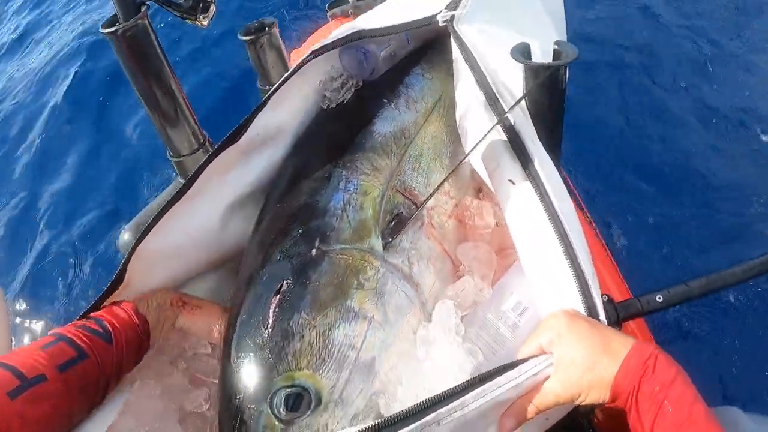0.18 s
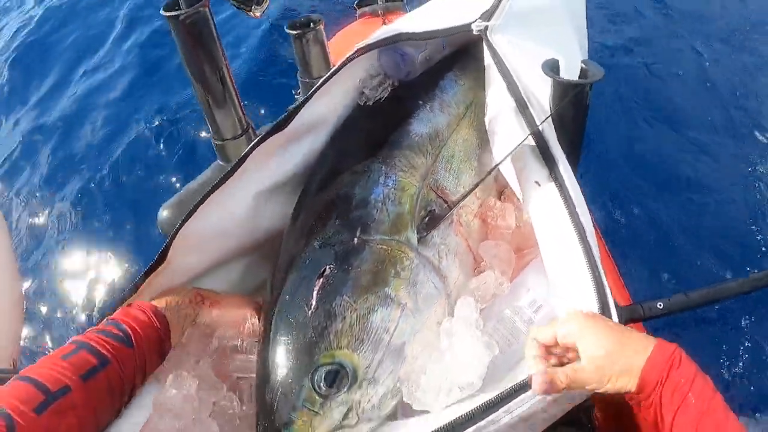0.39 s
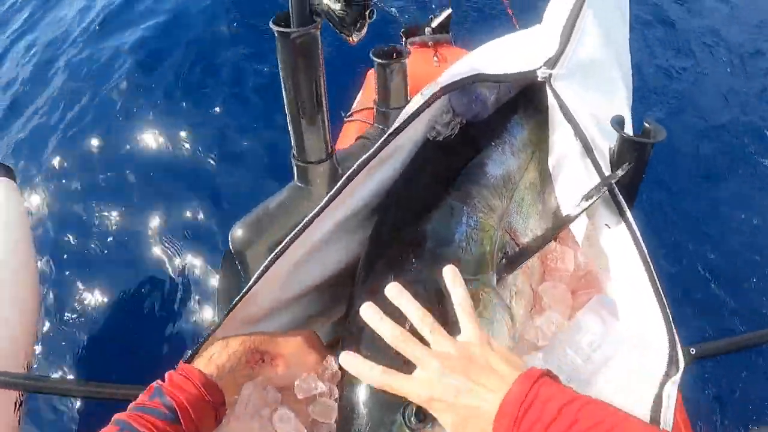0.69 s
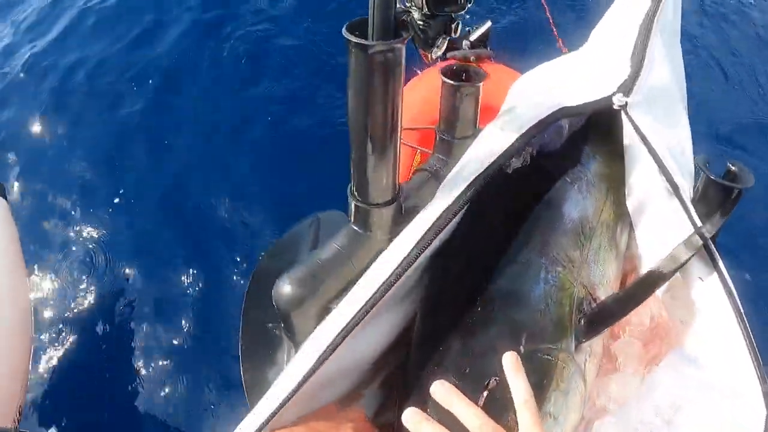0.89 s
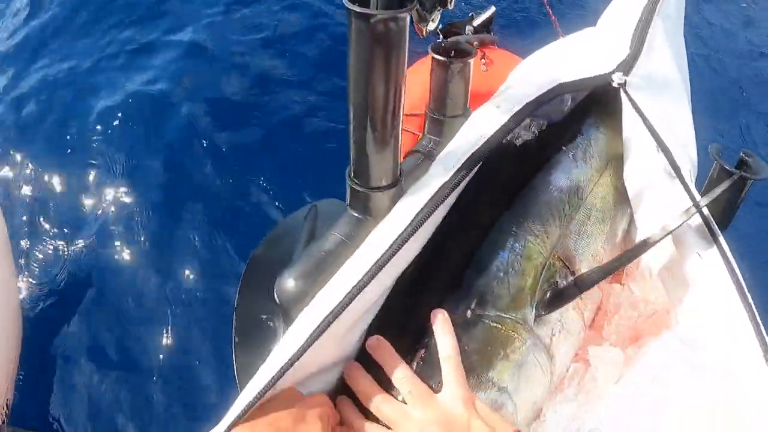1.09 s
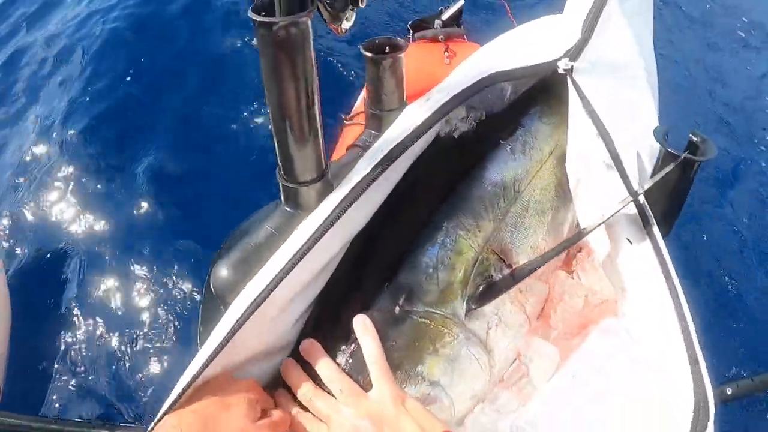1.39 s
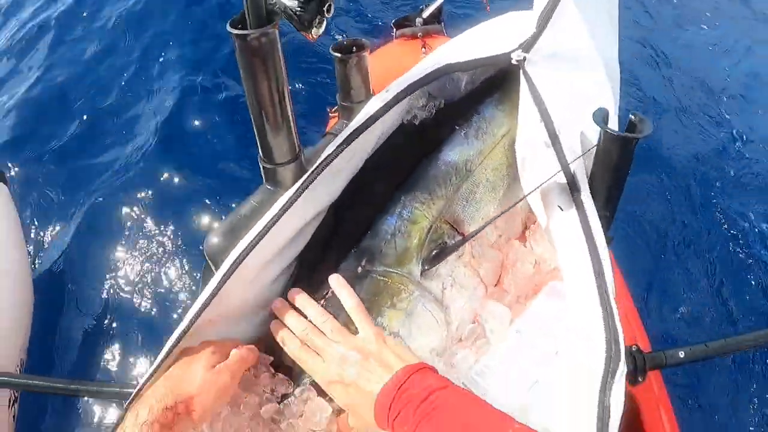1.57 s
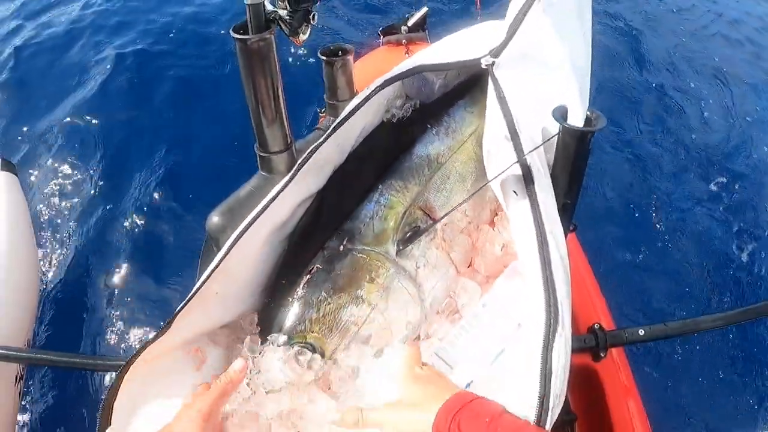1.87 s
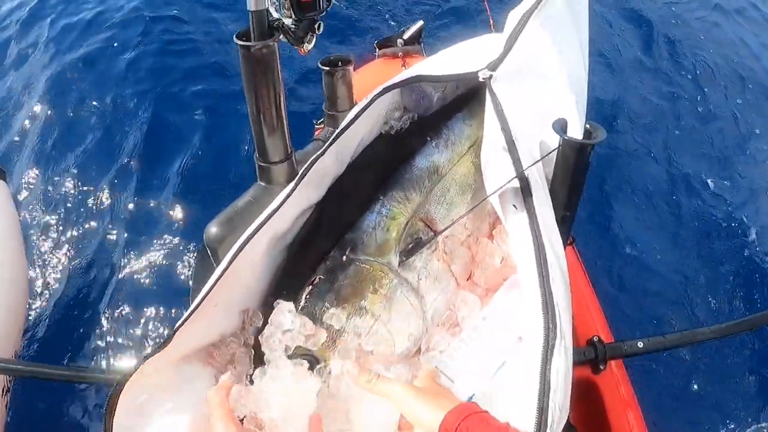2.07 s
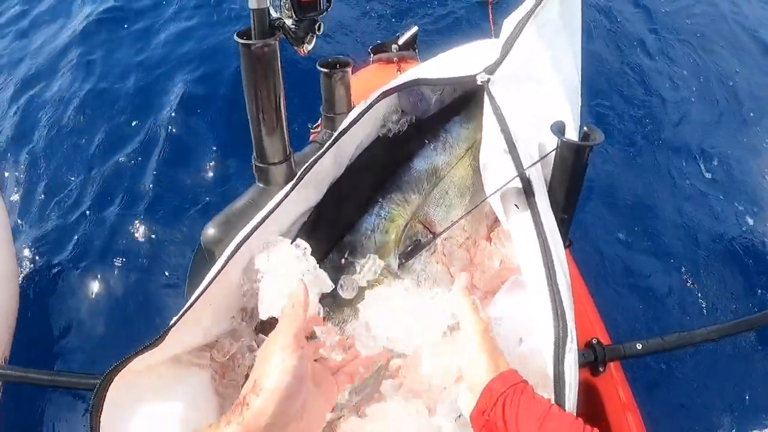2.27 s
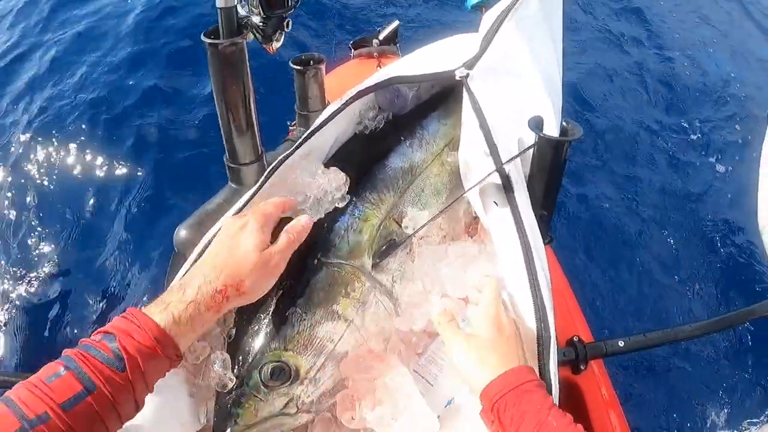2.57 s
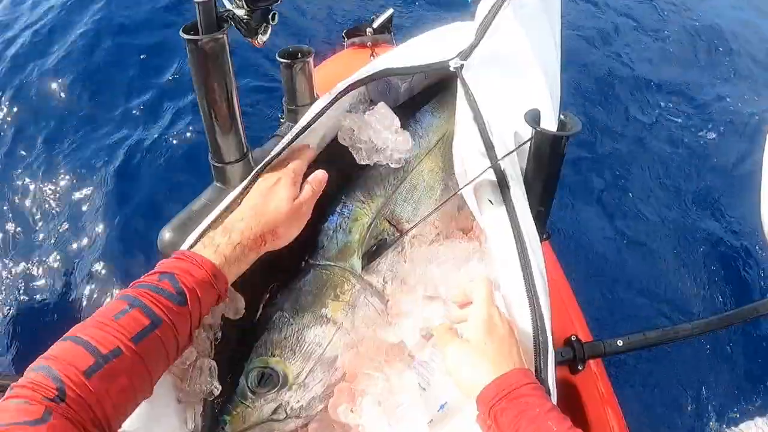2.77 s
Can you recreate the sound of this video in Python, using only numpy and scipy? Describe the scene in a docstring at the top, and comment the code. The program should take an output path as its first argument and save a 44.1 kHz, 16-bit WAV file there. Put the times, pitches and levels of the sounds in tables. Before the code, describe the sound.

Hands rustle a stiff fish bag, then dig and knock crushed ice on a small boat at sea

```python
"""A fish bag is dragged open on a kayak at sea: stick-slip jerks of stiff fabric, then a short run of zip teeth.
Hands dig in crushed ice, heard as filtered grains and short rings; lumps click and thud as damped oscillators.
Gusts buffet a close, nearly mono microphone as low noise and single swings of air.
Faintly beneath, filtered noise and rising bubbles wash along the hull, whose resonance hums."""
import sys
import numpy as np
from scipy import signal
from scipy.fft import rfft, irfft, next_fast_len
from scipy.io import wavfile
from scipy.ndimage import uniform_filter1d, map_coordinates

SR = 44100
rng = np.random.default_rng(int(sys.argv[2]) if len(sys.argv) > 2 else 0)


def generate_wav(signal):
    """Clip the signal to [-1, 1] and save it as 16-bit WAV at the path in sys.argv[1]."""
    frames = np.transpose(np.atleast_2d(signal))
    scaled = np.clip(frames, -1, 1) * 32767
    pcm = np.round(scaled).astype(np.int16)
    wavfile.write(sys.argv[1], SR, pcm)


N = 130095  # length in samples

# Levels below are settings; the source functions add their own gains and random swings.
# Rubbing of the bag: start_s, body_level_db, treble_level_db
BAG_RUBS = [(0, -37.5, -35.5), (.10, -50.5, -49.5), (.128, -34, -37), (.15, -42, -44), (.215, -34.5, -39.5),
            (.228, -30.5, -34), (.335, -26, -29.5), (.365, -28.5, -36.5), (.41, -33.5, -40),
            (.47, -37.5, -38.5), (.522, -37.5, -45), (.555, -33, -36), (.65, -39, -43), (.745, -38, -48),
            (.835, -36.5, -39), (.865, -31.5, -38), (.91, -30, -34), (.99, -33, -42.5), (1.03, -27, -38.5),
            (1.055, -21, -29), (1.115, -22.5, -29), (1.166, -21, -25.5), (1.27, -32.5, -37),
            (1.38, -32, -38.5), (1.48, -42.5, -47)]
# Spectra of the rubbing: frequency_hz, density_db
BAG_BODY_SPECTRUM = [(60, -26.5), (160, 0), (320, -2), (600, -0.5), (900, -3.5), (1300, -9.5), (1900, -38),
                     (4000, -60)]
BAG_TREBLE_SPECTRUM = [(700, -4), (1500, 3.5), (2300, 1.5), (3600, -0.5), (5000, -6), (6500, -12),
                       (8300, -13.5), (10000, -25.5), (11200, -33), (13200, -31), (15500, -72)]

# Slider motion of the zip: start_s, teeth_rate_hz, level_db
ZIP_RUN = [(.45, 195, -39), (.5, 259, -34), (.53, 330, -32), (.558, 462, -30.5), (.6, 422, -32),
           (.65, 372, -32), (.68, 287, -33.5), (.705, 248, -40)]
# Spectrum of the zip through the fabric: frequency_hz, density_db
ZIP_SPECTRUM = [(150, 2), (430, 6.5), (800, 3), (1300, -4), (2300, -12), (4000, -45)]
ZIP_JITTER_PERIODS, ZIP_SCATTER_DB = .036, 2.5  # standard deviations, timing in tooth periods

# Digging in the ice: start_s, body_level_db, treble_level_db
ICE_DIGS = [(1.47, -48, -54), (1.52, -35.5, -44), (1.68, -40, -42.5), (1.745, -31.5, -37.5),
            (1.80, -39, -42.5), (1.88, -38.5, -37.5), (1.94, -29, -31), (1.975, -38.5, -37),
            (2.045, -23.5, -31), (2.12, -32.5, -33), (2.15, -34, -37.5), (2.24, -36.5, -37.5),
            (2.285, -28.5, -30), (2.335, -36.5, -39), (2.42, -38, -38), (2.46, -31.5, -41.5),
            (2.515, -41.5, -39), (2.55, -34.5, -31), (2.63, -30, -32.5), (2.67, -39, -41), (2.75, -41, -43),
            (2.82, -45, -50), (2.88, -45.5, -43.5), (2.93, -63, -57)]
# Spectra of the crushed ice: frequency_hz, density_db
ICE_BODY_SPECTRUM = [(60, -61), (170, 4.5), (350, -11.5), (600, 5), (1150, 0.5), (1700, -6), (2500, -4.5),
                     (5000, -68)]
ICE_TREBLE_SPECTRUM = [(700, -14), (1500, -11), (2200, 2.5), (3700, 5), (5000, -1), (6500, -6),
                       (8300, -5.5), (10000, -17), (11200, -26), (13200, -23), (15500, -35)]
# Power share of separate pieces within the digging: before_lift_share, after_lift_share
LOOSE_SHARE = [.5, .7]
# Once the handful is lifted, only a share of the pieces still touch
LIFT_S, SPARSE_SHARE = 2.34, .3
CRACKLE_PER_S, CRACKLE_SPREAD_DB = 2200, 3
CHIP_CYCLES, CHIP_SPREAD_DB = 24, 4  # ring length in cycles to -60 dB
# Dulling of the smallest pieces by the microphone: frequency_hz, gain_db
CHIP_DULLING = [(5000, -1), (8500, -5.5), (11000, -15.5), (15000, -26)]

# Sharp clicks of ice: start_s, level_db, ring_hz
ICE_CLICKS = [(0.118, -26, 1700), (0.174, -25, 3070), (.317, -18, 1230), (.556, -26, 3850),
              (0.685, -30, 6900), (0.864, -27, 5000), (1.2853, -24, 3700), (1.44, -24, 3830),
              (1.6485, -20.5, 3430), (1.9142, -23, 2950), (1.9431, -20, 3720), (1.993, -24, 4400),
              (2.075, -18, 2400), (2.183, -23, 4900), (2.265, -20, 2500), (2.352, -21.5, 2980),
              (2.402, -25, 4200), (2.4495, -16, 2100), (2.453, -17.5, 3040), (2.465, -14.5, 3580),
              (2.4925, -20, 1950), (2.5043, -26, 3230), (2.525, -20, 7000), (2.536, -17, 3440),
              (2.549, -16, 1600), (2.5665, -21, 5500), (2.591, -14, 3700), (2.5975, -15.5, 3600),
              (2.6125, -16, 3000), (2.699, -15.5, 3090), (2.7738, -22, 4300), (2.8326, -31, 3900)]
CLICK_Q, CLICK_T60_S, CLICK_DB = 8, .026, -7
CRACK_Q, CRACK_T60_S, CRACK_DB = 1.3, .011, -2
ATTACK_S = .00015  # onset time constant, shared with the slap of loose ice

# Dull blows of lumps and hands on the bag: start_s, level_db, pitch_hz
BAG_THUDS = [(0.118, -27.5, 500), (.32, -12, 780), (.85, -22, 700), (1.107, -12, 500), (1.489, -25, 720),
             (1.587, -20, 296), (1.604, -22, 520), (1.834, -26, 560), (2.057, -14, 550), (2.124, -17, 418),
             (2.166, -17.5, 310), (2.234, -16.5, 460), (2.285, -19, 206), (2.371, -20, 294),
             (2.443, -21, 385), (2.481, -18, 305), (2.535, -14, 470), (2.5487, -7.5, 430),
             (2.561, -14.5, 400), (2.583, -17, 500), (2.6158, -4.5, 285), (2.635, -13.5, 300),
             (2.688, -23, 352), (2.785, -29, 250), (2.886, -25, 373)]
THUD_PEAK_CYCLES, THUD_DB = .61, 2
SMACK_RATIO, SMACK_DB = 2.0, -6.5  # pitch ratio and level against the main swing
HOLLOW_HZ, HOLLOW_PEAK_CYCLES, HOLLOW_DB = 188, 1, -20
SLAP_DB, SLAP_T60_S = -22, .03

# Gusts on the microphone: start_s, level_db
WIND_GUSTS = [(0, -36), (.33, -33), (.65, -38.5), (.78, -28.5), (.89, -28.5), (.98, -24.5), (1.06, -28.5),
              (1.14, -20.5), (1.38, -23.5), (1.47, -42), (1.55, -36), (1.61, -24), (1.72, -32.5),
              (1.83, -42), (2.05, -28.5), (2.36, -38), (2.65, -30), (2.71, -39), (2.95, -44)]
# Spectrum of the gusts: frequency_hz, density_db
RUMBLE_SPECTRUM = [(8, -44), (28, 1.5), (48, 0), (80, -4.5), (125, -6.5), (200, -14), (400, -28),
                   (1500, -84.5)]
# Single low buffets of air: start_s, level_db, pitch_hz
AIR_PUFFS = [(0.037, -25.5, 68.5), (.328, -37, 74), (0.68, -26, 45.4), (0.747, -23, 126.7),
             (0.796, -21, 97), (0.877, -16, 48), (1.129, -11.5, 101), (1.367, -17.5, 109),
             (1.581, -26, 72.5), (1.689, -27, 57.5)]
PUFF_PEAK_CYCLES = .75

# Spectrum of the wash: frequency_hz, density_db
SEA_SPECTRUM = [(40, -23), (150, -5), (400, 5), (1200, -9), (3000, -23.5), (6500, -28.5), (10000, -35),
                (15500, -41)]
SEA_DB, BUBBLE_DB, BUBBLE_SPREAD_DB = -46, -49, 4
HULL_HZ, HULL_Q, HULL_DB, HULL_SWAY_DB = 250, 4, -49, 2.5

BAG_T60_S, BAG_TAIL_DB = .07, -13  # reverberation inside the open bag
# Width of the stereo image: frequency_hz, side_over_mid_db
STEREO_SIDE = [(100, -97), (5000, -54.5), (9000, -40), (11500, -11), (15000, 4)]
TOP_HZ = 15600  # band limit


def bag():
    """Stick-slip friction: stiff fabric catches and slips in dense little jerks."""
    body_db, treble_db = curves(BAG_RUBS)
    jerks = amp(1.93 * wobble(110))
    body = colour(grains(5000, spread_db=4.0) * jerks, BAG_BODY_SPECTRUM)
    treble = colour(grains(7000, spread_db=2.0) * jerks, BAG_TREBLE_SPECTRUM)
    body = patchy(body, depth_db=2.4) * amp(body_db + 1.0)
    treble = patchy(treble, depth_db=1.0) * amp(treble_db + 2.0)
    return during(BAG_RUBS) * (body + treble)


def zipper():
    """Impulse train: one tick per tooth as the slider speeds up and slows, filtered by the fabric."""
    rate, db = curves(ZIP_RUN)
    teeth_passed = np.floor(np.cumsum(rate) / SR)
    at = np.flatnonzero(np.diff(teeth_passed))
    chance = rng.standard_normal((N // 20, 2))[:len(at)]
    jitter = chance[:, 0] * ZIP_JITTER_PERIODS * SR / rate[at]
    when = np.clip(at + jitter, 0, N - 1).astype(int)
    size = amp(ZIP_SCATTER_DB * chance[:, 1]) / np.sqrt(rate[at])  # steady power at any rate
    ticks = np.bincount(when, size, N)
    return unit(colour(ticks - ticks.mean(), ZIP_SPECTRUM)) * amp(db) * during(ZIP_RUN)


def digging():
    """Granular contact: crushed ice crunches in clumps, then thins towards separate knocks and chinks."""
    body_db, treble_db = curves(ICE_DIGS)
    clumps = amp(1.67 * wobble(90))
    loose = np.interp(np.arange(N) / SR, [LIFT_S - .05, LIFT_S + .05], LOOSE_SHARE)
    body = colour(grains(1500, spread_db=4.5) * clumps, ICE_BODY_SPECTRUM)
    treble = colour(grains(CRACKLE_PER_S, CRACKLE_SPREAD_DB) * clumps, ICE_TREBLE_SPECTRUM)
    body, treble = patchy(body, depth_db=3.0), patchy(treble, depth_db=1.5)
    knocks = chips(centre_hz=637, spread=0.514, spread_db=0.5, cycles=21.0, count=1100)
    chinks = chips(centre_hz=2964, spread=0.43, spread_db=CHIP_SPREAD_DB, cycles=CHIP_CYCLES, count=2400)
    chinks = colour(chinks, CHIP_DULLING)
    crunch = body * amp(body_db + 4.2) + treble * amp(treble_db + 2.56)
    pieces = knocks * amp(body_db + 1.0) + chinks * amp(treble_db + 1.1)
    return during(ICE_DIGS) * (np.sqrt(1 - loose) * crunch + np.sqrt(loose) * pieces)


def chips(centre_hz, spread, spread_db, cycles, count):
    """Free vibration: pieces of ice knock at random, each with its own brief pitch; rms 1."""
    out, t = np.zeros(N), np.arange(SR // 25) / SR
    chance = rng.random((count, 2))
    variety = np.clip(rng.standard_normal((count, 2)), -1.9, 1.9)
    for (when, keep), (a, b) in zip(chance, variety):
        s, hz = when * N / SR, centre_hz * np.exp(spread * a)
        share = SPARSE_SHARE if s > LIFT_S else 1
        if keep < share:
            envelope = amp(-60 * hz * t / cycles) * (1 - np.exp(-2 * hz * t))
            ring = np.sin(2 * np.pi * hz * t) * envelope
            add(out, s, amp(spread_db * b) * ring / np.sqrt(share))  # fewer but stronger
    return unit(out)


def clicks():
    """Impact excitation: lumps of ice meet in a broad crack and a short ring at one centre frequency."""
    out = np.zeros(N)
    for s, db, hz in ICE_CLICKS:
        add(out, s, amp(db + CLICK_DB) * chink(hz, CLICK_Q, CLICK_T60_S, order=2))
        add(out, s, amp(db + CRACK_DB) * chink(hz, CRACK_Q, CRACK_T60_S, order=1))
    return colour(out, CHIP_DULLING)


def chink(hz, q, t60, order):
    """Resonance: a decaying noise burst excites one mode of a piece of ice."""
    t = np.arange(SR // 25) / SR
    b, a = signal.iirpeak(min(hz, SR / 5), max(q, 1), SR)
    fade = amp(-60 * t / t60) * (1 - np.exp(-t / ATTACK_S))
    ring = signal.sosfilt([[*b, *a]] * order, rng.standard_normal(len(t)) * fade)
    return unit(ring) * np.sqrt(np.mean(fade ** 2))


def thuds():
    """Damped oscillation: the padded bag swings under a quicker smack; its hollow booms, loose ice slaps."""
    out, t = np.zeros(N), np.arange(SR // 6) / SR
    slap = noise(ICE_BODY_SPECTRUM)
    slap_fade = amp(SLAP_DB - 60 * t / SLAP_T60_S) * (1 - np.exp(-t / ATTACK_S))
    hollow = amp(HOLLOW_DB) * swing(HOLLOW_HZ, HOLLOW_PEAK_CYCLES)
    for s, db, hz in BAG_THUDS:
        loose = np.roll(slap, rng.integers(N))[:len(t)] * slap_fade
        boom = hollow * min(2 * HOLLOW_HZ / hz, 1)  # weaker under high-pitched blows
        smack = amp(SMACK_DB) * swing(SMACK_RATIO * hz, THUD_PEAK_CYCLES)
        blow = swing(hz, THUD_PEAK_CYCLES) + smack
        add(out, s, amp(db + THUD_DB) * (blow + boom + loose))
    return out


def swing(hz, peak_cycles):
    """Damped oscillator whose envelope is largest after peak_cycles."""
    cycles = hz * np.arange(SR // 6) / SR
    u = cycles / peak_cycles
    return np.sin(2 * np.pi * cycles) * (u * np.exp(1 - u)) ** 2


def wind():
    """Turbulent pressure: gusts break into low lumps at the microphone, and single buffets stand out."""
    db, = curves(WIND_GUSTS)
    out = amp(db) * unit(noise(RUMBLE_SPECTRUM) * amp(2.8 * wobble(28.29)))
    for s, level_db, hz in AIR_PUFFS:
        add(out, s, amp(level_db) * swing(hz, PUFF_PEAK_CYCLES))
    return out


def water(count=90, centre_hz=650, cycles=22, rise=0.34):
    """Bubble resonance: small decaying tones rise in pitch within a soft noise wash along the hull."""
    bubbles, t = np.zeros(N), np.arange(SR // 10) / SR
    starts = rng.random(count) * N / SR
    for s, (a, b) in zip(starts, rng.standard_normal((count, 2))):
        u = t * centre_hz * np.exp(0.364 * a) / cycles  # 1 when the tone is 60 dB down
        tone = np.sin(2 * np.pi * cycles * u * (1 + rise * u))
        add(bubbles, s, amp(BUBBLE_SPREAD_DB * b - 60 * u) * tone)
    wash = amp(SEA_DB + 0.33 * wobble(5.2)) * noise(SEA_SPECTRUM)
    return wash + amp(BUBBLE_DB) * unit(bubbles)


def hull():
    """Cavity resonance: noise through a narrow peak makes the hollow hull hum, swaying in level."""
    b, a = signal.iirpeak(HULL_HZ, HULL_Q, SR)
    hum = unit(signal.sosfilt([[*b, *a]] * 2, rng.standard_normal(N)))
    return hum * amp(HULL_DB + HULL_SWAY_DB * wobble(8.85))


def amp(db):
    """Decibel law: level to amplitude ratio."""
    return 10 ** (np.asarray(db) / 20)


def unit(x):
    """Normalisation to rms 1."""
    return x / np.sqrt(np.mean(x ** 2) + 1e-20)


def curves(rows):
    """Linear interpolation: one value per sample for each column after the time."""
    s, *cols = np.transpose(rows)
    return [np.interp(np.arange(N) / SR, s, c) for c in cols]


def during(rows, fade_s=0.014):
    """Gating: 1 over the span of a table, fading outside it."""
    t = np.arange(N) / SR
    inside_s = np.minimum(t - rows[0][0], rows[-1][0] - t)
    return np.clip(1 + inside_s / fade_s, 0, 1)


def wobble(rate):
    """Slow random modulation: a smooth curve through rate random knots a second."""
    return map_coordinates(rng.standard_normal(4096), [np.arange(N) * rate / SR], mode="wrap")


def colour(x, points):
    """Minimum-phase filtering: a causal response through (Hz, dB) points, by folding the cepstrum."""
    m = 2 ** 18
    f, db = np.transpose(points)
    log_hz = np.log(np.fft.rfftfreq(m, 1 / SR) + 1)
    cepstrum = irfft(np.log(amp(np.interp(log_hz, np.log(f), db))))
    cepstrum[1:m // 2] *= 2
    cepstrum[m // 2 + 1:] = 0
    return irfft(rfft(x, m) * np.exp(rfft(cepstrum)))[:N]


def noise(points):
    """Spectral shaping: white noise coloured by (Hz, dB) points; rms 1."""
    return unit(colour(rng.standard_normal(N), points))


def add(track, s, sound):
    """Superposition: mix a sound into the track, in place, at time s."""
    part = track[max(round(s * SR), 0):][:len(sound)]
    part += sound[:len(part)]


def grains(rate, spread_db):
    """Shot noise: random tiny impulses of uneven size, about rate a second; rms 1."""
    hit = rng.random(N) < rate / SR
    sign = rng.choice([-1, 1], N)
    size = amp(spread_db * np.minimum(rng.exponential(size=N), 3))
    return unit(hit * sign * size)


def patchy(x, depth_db):
    """Time-varying filtering: colour shifts as folds and pieces change shape; rms 1."""
    z = signal.stft(x, nperseg=512)[2]
    field = uniform_filter1d(rng.standard_normal(z.shape), size=3, axis=0)  # smooth over frequency
    field = uniform_filter1d(field, size=4, axis=1)  # smooth over time
    return unit(signal.istft(z * amp(depth_db * unit(field)), nperseg=512)[1][:N])


def scene():
    """Convolution: clicks and thuds sound inside the open bag, which answers briefly."""
    t = np.arange(SR // 6) / SR
    tail = rng.standard_normal(len(t)) * amp(-60 * t / BAG_T60_S)
    hits = clicks() + thuds()
    answer = amp(BAG_TAIL_DB) * signal.fftconvolve(hits, tail / np.linalg.norm(tail))[:N]
    mid = bag() + zipper() + digging() + hits + answer + wind() + water() + hull()
    return np.array([mid, mid])


def record(dry):
    """Mid-side stereo: the channels part chiefly in the highest treble; a band limit cuts both."""
    side = colour(dry[0] * unit(wobble(400)), STEREO_SIDE)
    m = next_fast_len(N + SR // 2)
    passband = np.fft.rfftfreq(m, 1 / SR) < TOP_HZ
    return irfft(rfft(dry + np.array([side, -side]), m) * passband, m)[:, :N]


dry = scene()
out = record(dry)
generate_wav(out)
```